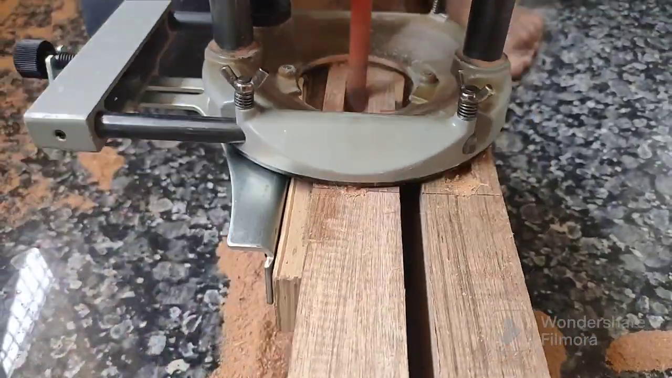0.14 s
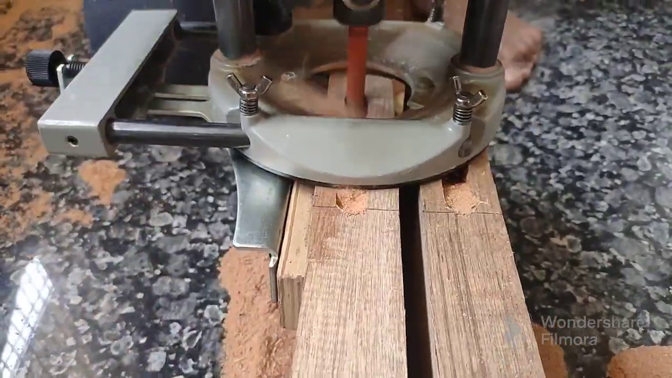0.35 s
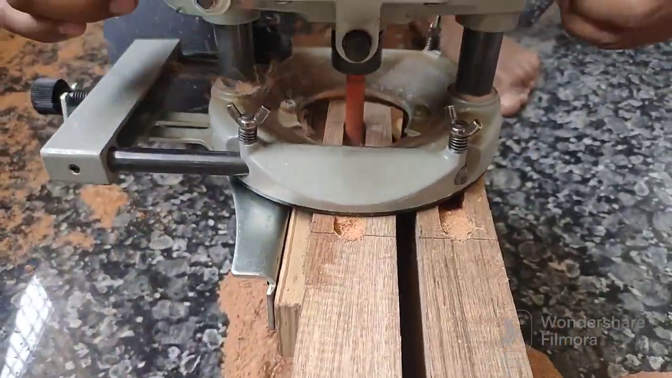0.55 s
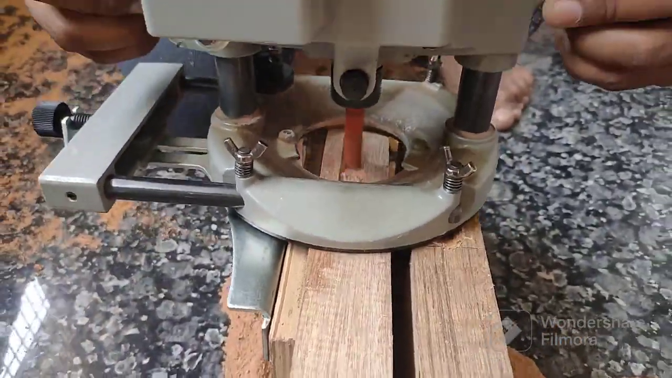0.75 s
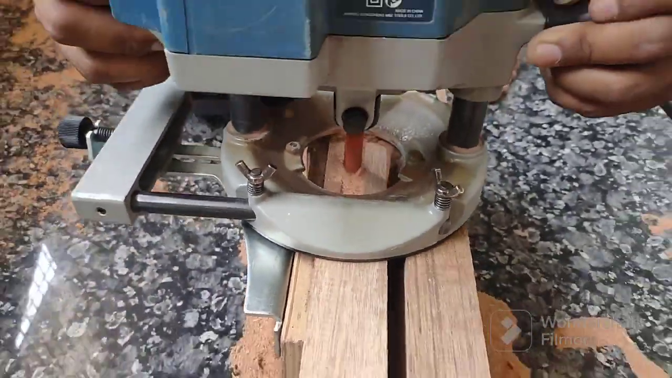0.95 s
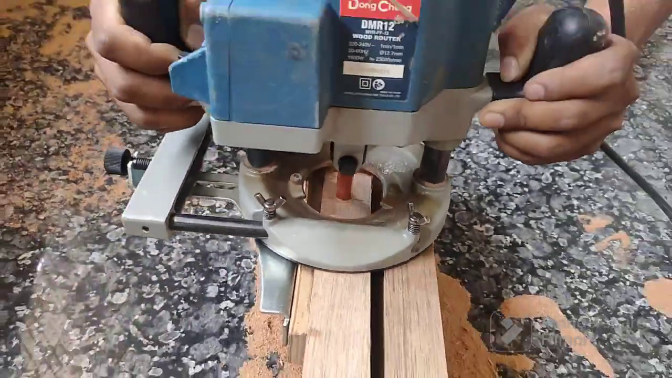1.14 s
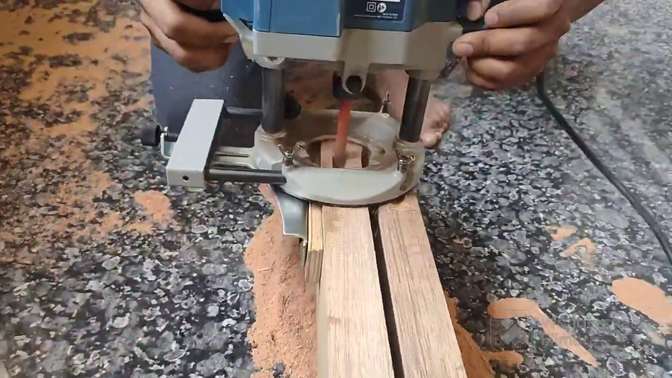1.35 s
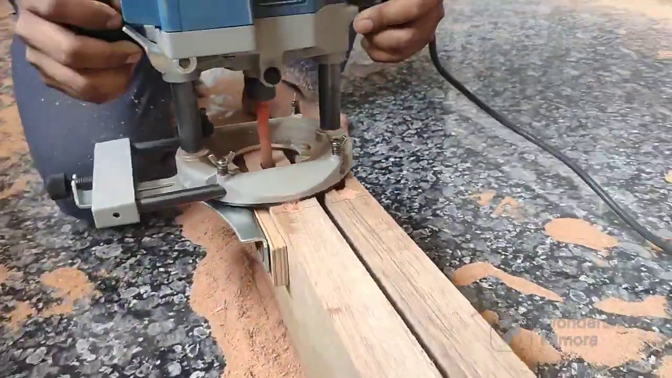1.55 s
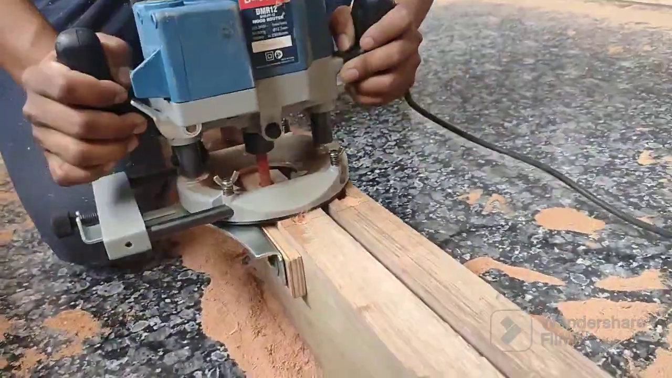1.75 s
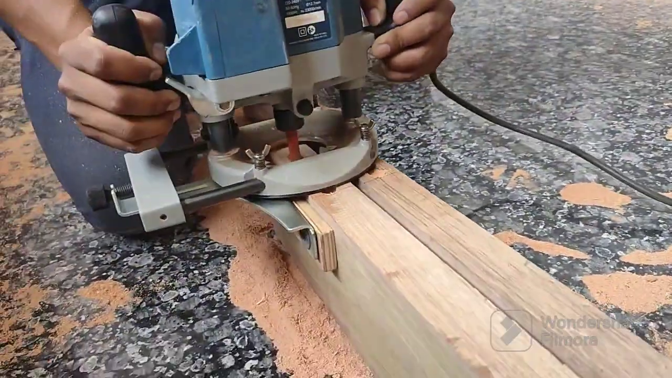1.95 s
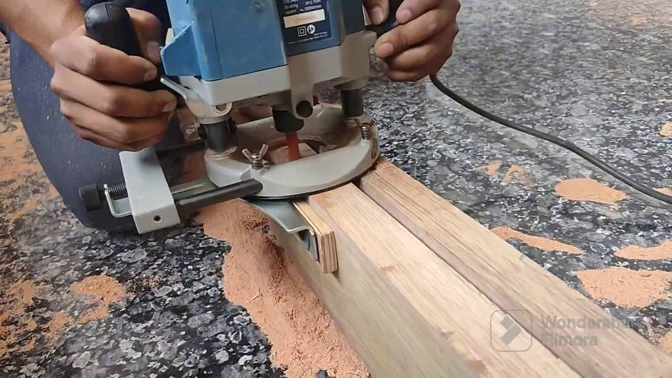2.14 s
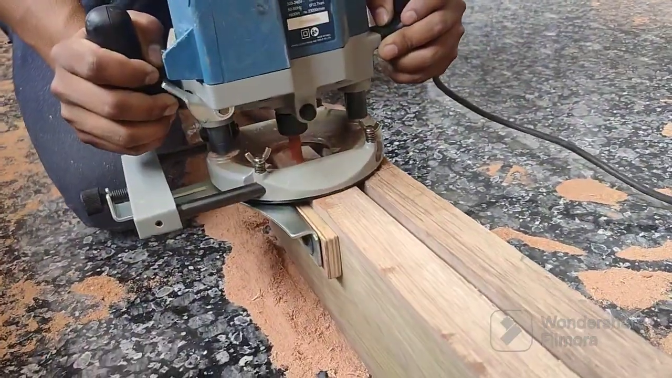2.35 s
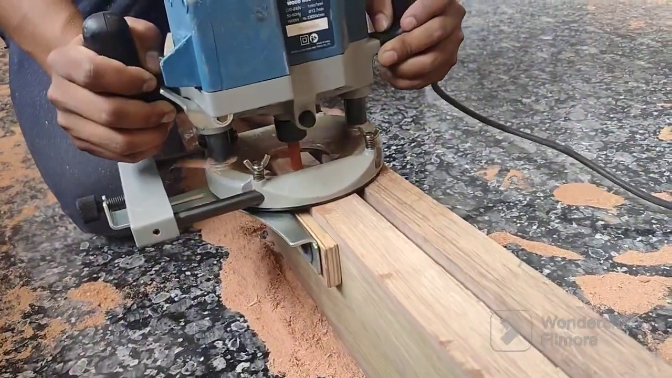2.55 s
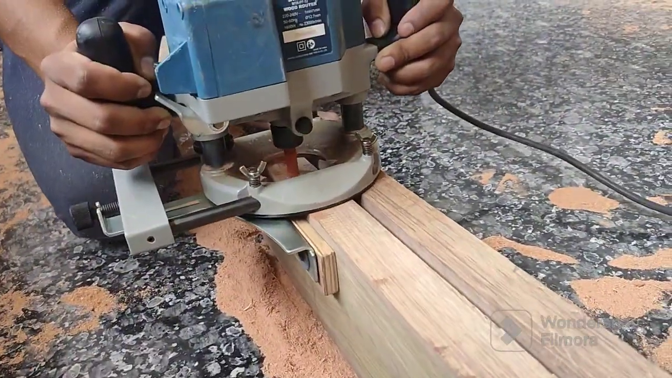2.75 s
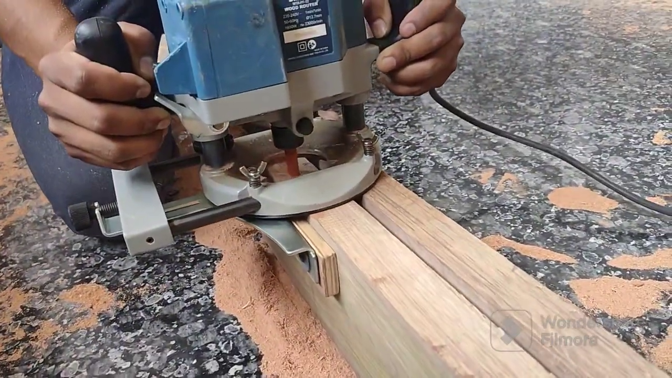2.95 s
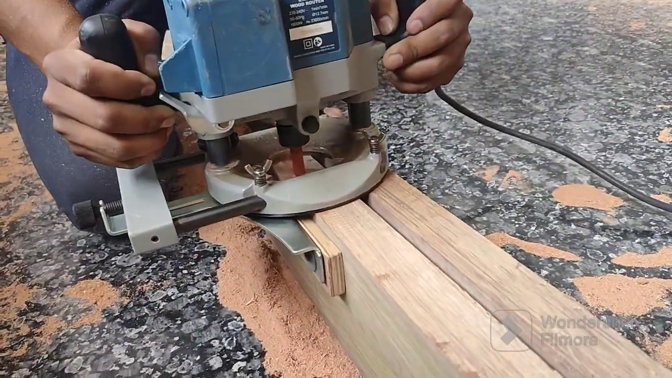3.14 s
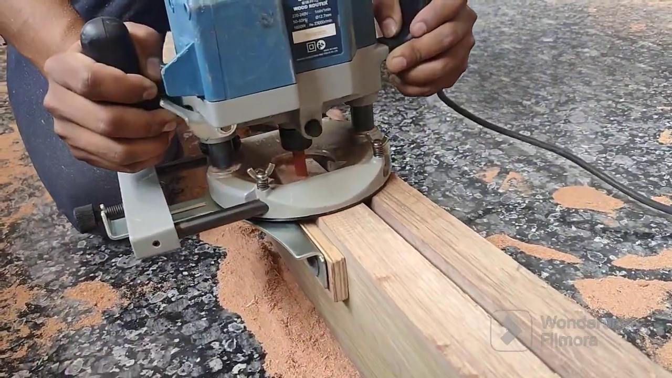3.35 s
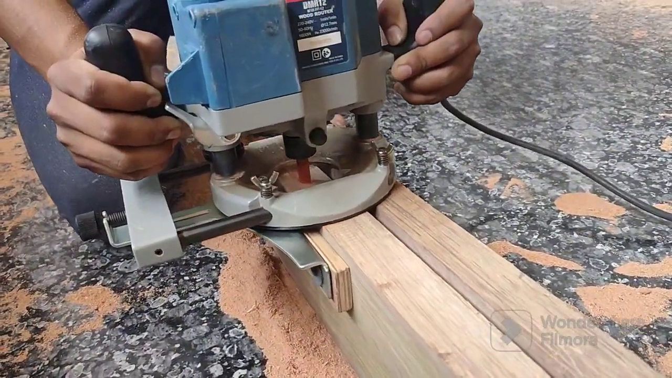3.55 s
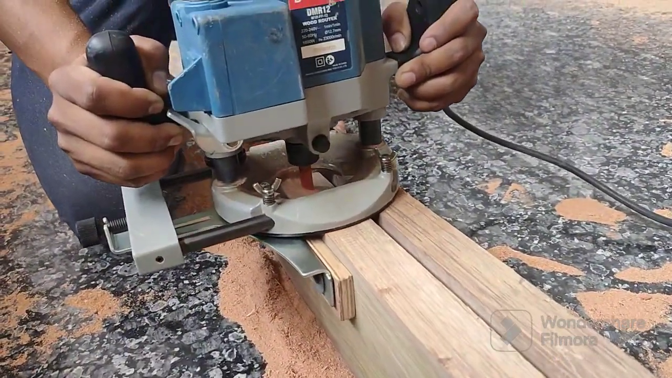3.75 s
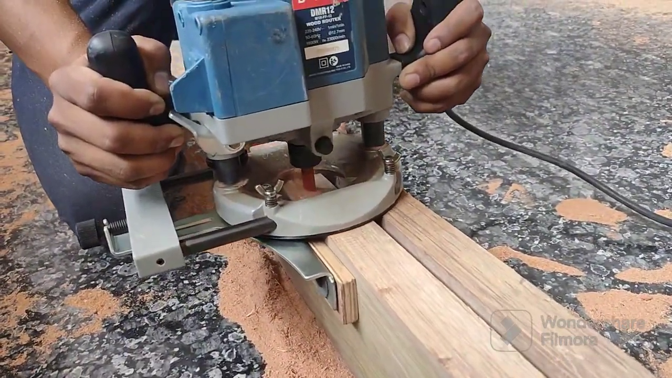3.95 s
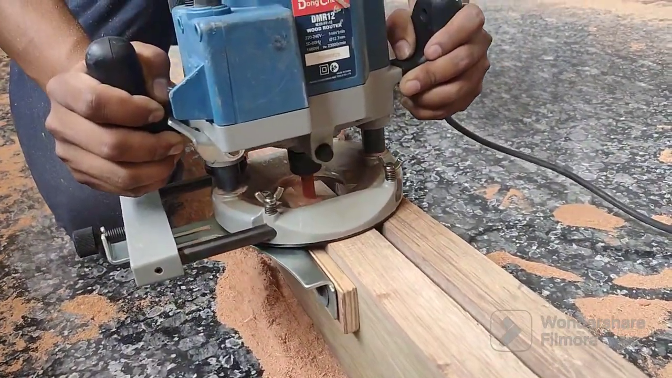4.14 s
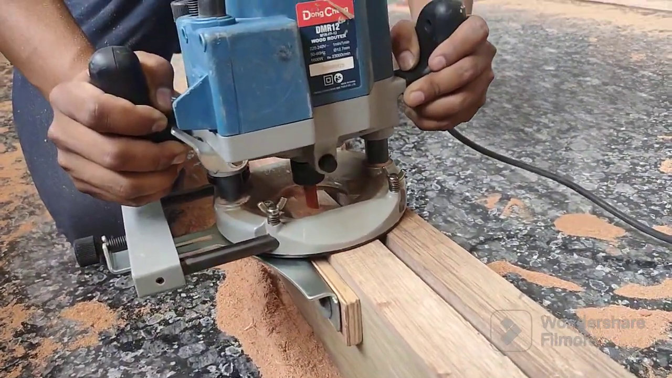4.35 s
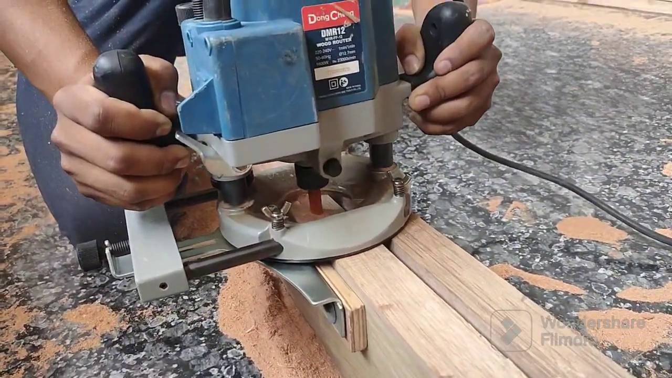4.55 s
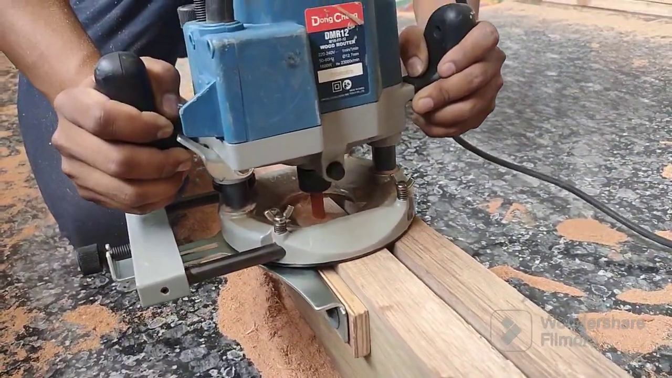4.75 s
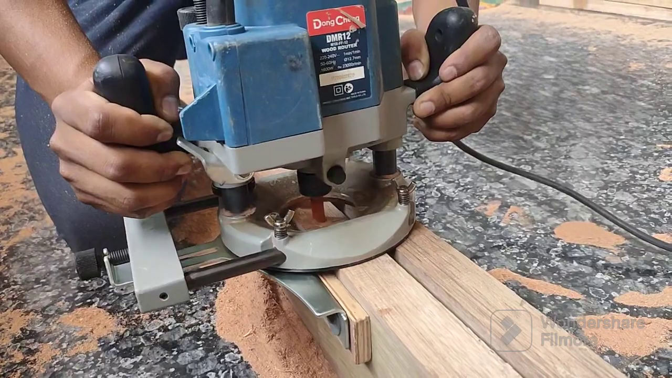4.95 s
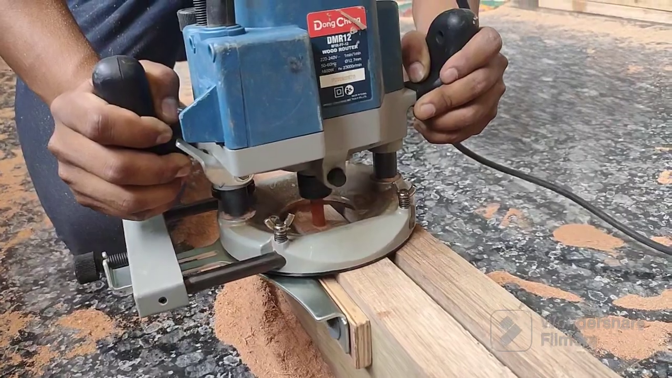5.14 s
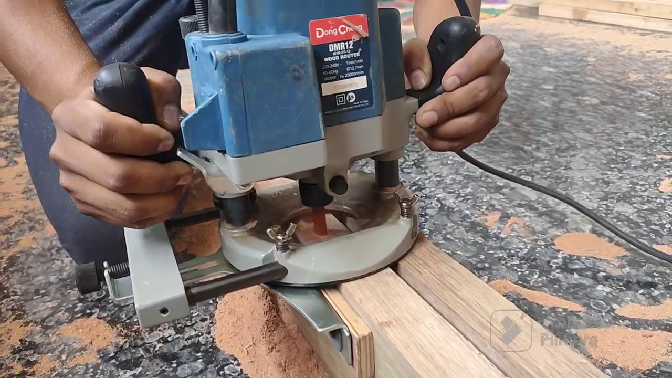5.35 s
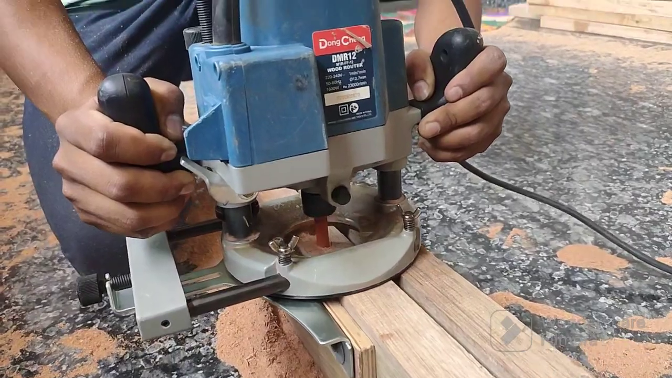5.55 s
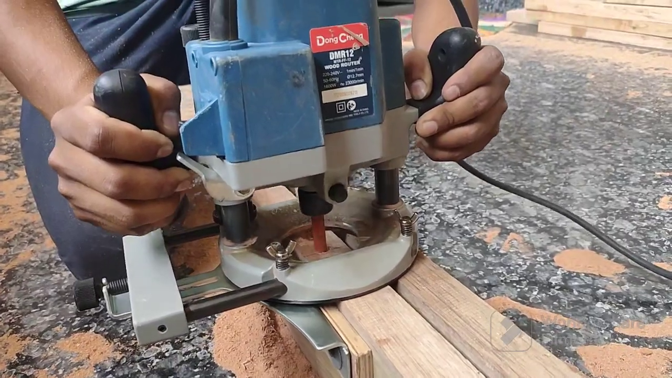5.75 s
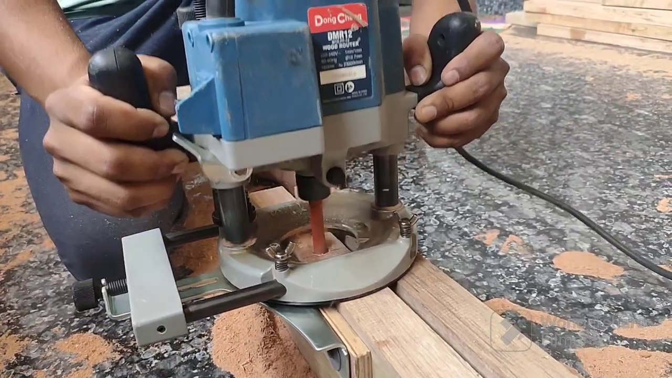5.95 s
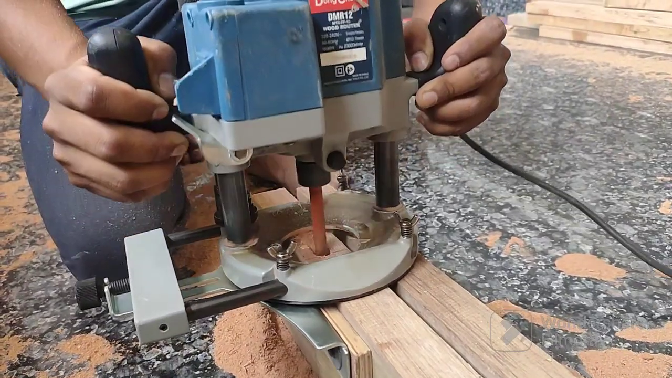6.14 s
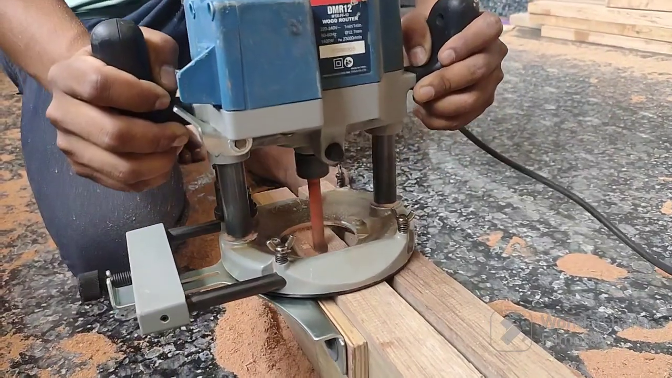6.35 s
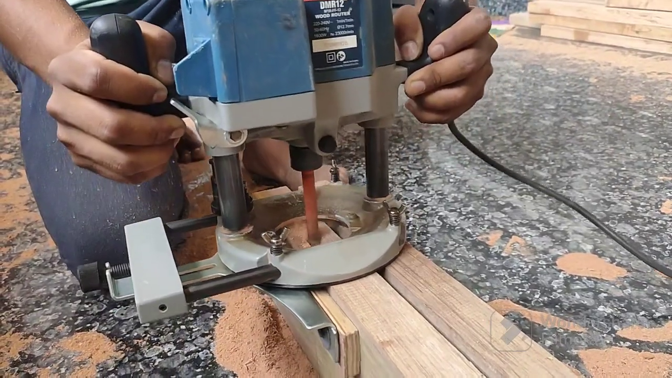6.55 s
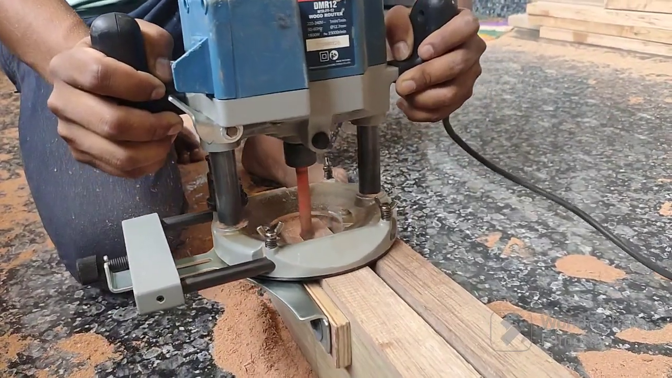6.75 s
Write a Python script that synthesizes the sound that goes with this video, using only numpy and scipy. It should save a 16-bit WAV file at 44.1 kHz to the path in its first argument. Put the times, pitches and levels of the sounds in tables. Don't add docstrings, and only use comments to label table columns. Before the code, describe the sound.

A handheld router works on a wooden batten, recorded closely indoors with the right channel almost silent. Whine climbs, then sags twice under load with gritty snarls, a brief free scream between. A long, dense, wavering grind follows, metallic chatter flickering in it. Finally the bit leaves the wood and the motor speeds up into a cleaner airy whir. Soft bumps from the hands early on; slightly dulled, compressed sound.

```python
import sys
import numpy as np
from scipy import signal
from scipy.fft import rfft, irfft, next_fast_len
from scipy.io import wavfile
from scipy.ndimage import uniform_filter1d

SR = 44100
rng = np.random.default_rng(int(sys.argv[2]) if len(sys.argv) > 2 else 0)


def dump(signal):
    limited = np.clip(np.atleast_2d(signal).T, -1, 1)
    pcm = np.round(limited * 32767).astype(np.int16)
    wavfile.write(sys.argv[1], SR, pcm)


def makeup_ratio(level_db):
    decades = np.asarray(level_db, float) / 20
    return 10 ** decades


N = 303402


def rms_one(x):
    return x / np.sqrt(np.mean(x ** 2) + 1e-20)


def in_time(rows):
    s, *columns = np.transpose(rows)
    return [np.interp(np.arange(N) / SR, s, c) for c in columns]


def at_hz(points, hz):
    return np.interp(np.log(hz), np.log(np.array(points)[:, 0]), np.array(points)[:, 1])


def swells(rows):
    t = np.arange(0, N + 40, 40) / SR
    total = sum(height * np.exp(-.5 * ((t - s) / half_s) ** 2) for s, height, half_s in rows)
    return np.interp(np.arange(N) / SR, t, total)


def bursts(rows):
    return swells([(s, makeup_ratio(db), half_s) for s, db, half_s in rows])


def drift(rate_hz):
    pole = np.exp(-80 * np.pi * rate_hz / SR)
    white = rng.standard_normal(N // 40 + 2002)
    slow = signal.lfilter([1], [1, -2 * pole, pole * pole], white)[2000:]
    return np.interp(np.arange(N) / 40, np.arange(len(slow)), rms_one(slow))


def colour(x, spectrum):
    size = next_fast_len(N)
    gain = makeup_ratio(at_hz(spectrum, np.fft.rfftfreq(size, 1 / SR) + 1))
    return irfft(rfft(x, size) * gain, size)[:N]


def patchy_noise(spectrum, shared_db, own_db, rate_hz):
    ends_hz = np.array(spectrum)[[0, -1], 0]
    edges_hz = np.geomspace(ends_hz[0], min(ends_hz[1], 16000), 8)
    white, together, out = rng.standard_normal((2, N)), drift(rate_hz), 0
    for k, (low, high) in enumerate(zip(edges_hz, edges_hz[1:])):
        bandpass = signal.butter(2, [low, high], "band", fs=SR, output="sos")
        band = signal.sosfilt(bandpass, white[k % 2])
        out = out + band * makeup_ratio(shared_db * together + own_db * drift(rate_hz))
    return rms_one(colour(out, spectrum))


def room(x, t60_s):
    t = np.arange(int(.5 * SR)) / SR
    tail = rng.standard_normal(len(t)) * makeup_ratio(-60 * t / t60_s)
    return signal.fftconvolve(x, tail / np.linalg.norm(tail))[:N]


def bumps():
    # start in seconds, peak in dB, pitch in Hz, t60 in seconds.
    shifts = [
        (0.906, -19.5, 28, 0.2),
        (1.15, -24, 34.73, 0.099),
        (1.225, -31, 37.2, .06),
        (1.289, -25, 50, 0.066),
        (5.54, -37, 30, 0.23),
    ]
    out = np.zeros(N)
    for s, db, hz, t60_s in shifts:
        t = np.maximum(np.arange(N) / SR - s, 0)
        out += makeup_ratio(db - 60 * t / t60_s) * (1 - np.exp(-t / 0.0036)) * np.sin(2 * np.pi * hz * t)
    return out


def handling():
    # frequency in Hz, level in dB.
    thump = [(15, -6), (30, -4), (60, -3), (120, -2.5), (220, -9), (400, -16), (800, -41.5)]
    # centre in seconds, level in dB, half length in seconds.
    gusts = [(.4, -47, 0.02), (.925, -38, 0.017), (1.167, -46, 0.012), (1.24, -36, 0.015),
             (1.302, -19.5, 0.0071), (1.5, -59, 0.015), (1.63, -51, 0.026), (2.17, -46, 0.045),
             (2.434, -51, 0.019), (2.66, -52, 0.092), (3.85, -51, 0.071), (4.43, -52, 0.046),
             (4.96, -51, 0.053), (5.35, -53, .08), (5.57, -43, 0.034), (6.57, -47, 0.042)]
    rumble_gain = makeup_ratio(-56.5 + 0.64 * drift(1.8)) + bursts(gusts)
    left = bumps() + rumble_gain * rms_one(colour(rng.standard_normal(N), thump))
    right = makeup_ratio(-78 + 8.0 * drift(6.5)) * rms_one(colour(rng.standard_normal(N), thump))
    return left, right


def shaft():
    # time in seconds, speed in turns per s.
    first_plunge = [
        (0, 274),
        (.47, 363),
        (.52, 345),
        (.62, 340.5),
        (.77, 323),
        (.91, 288),
        (.99, 279.3),
        (1.27, 274.7),
        (1.335, 264),
    ]
    second_plunge = [
        (1.78, 363),
        (1.83, 353.4),
        (1.95, 342),
        (2.11, 316),
        (2.18, 281),
        (2.27, 271.7),
        (2.61, 259.2),
    ]
    slot = [
        (2.85, 261.8),
        (3.02, 257.7),
        (3.2, 258.7),
        (4.15, 256.1),
        (4.78, 267.5),
        (5.28, 270.8),
        (5.7, 270),
        (5.84, 280.4),
        (5.91, 280),
    ]
    # start in seconds, free speed in turns per s, slow gap in turns per s,
    # slow time in seconds, quick gap in turns per s.
    run_ups = [
        (.025, 367, 75, .15, 28),
        (1.335, 367, 75, .15, 28),
        (5.91, 340, 60, .6, 0),
    ]
    quick_s = .02
    loaded = first_plunge + second_plunge + slot
    speed, t = in_time(loaded)[0], np.arange(N) / SR
    speed[t < run_ups[0][0]] = loaded[0][1]
    for start_s, top, slow_gap, slow_s, quick_gap in run_ups:
        end_s = min([s for s, _ in loaded if s > start_s] + [N / SR])
        free = (t >= start_s) & (t < end_s)
        since = t[free] - start_s
        speed[free] = top - slow_gap * np.exp(-since / slow_s) - quick_gap * np.exp(-since / quick_s)
    return speed


def feed():
    # centre in seconds, push in dB, half length in seconds.
    pushes = [(.47, 4, 0.016), (.61, 4, 0.021), (.74, 1.5, 0.062), (.84, 0, 0.023), (.96, -6.5, 0.039),
              (1.04, 2.5, 0.049), (1.21, 6.5, 0.0078), (1.3, 6, 0.0066), (2.0, 7, 0.025),
              (2.15, 5.5, 0.068), (2.25, -3, 0.043), (2.43, 3.5, 0.039), (2.575, 5.5, 0.027),
              (2.72, 3, 0.035), (2.92, 4, 0.055), (3.3, 3, 0.16), (3.85, 3.5, 0.064), (4.45, 2, 0.1),
              (4.75, 0.5, 0.014), (4.92, 5.5, 0.11), (5.08, 4.5, 0.018), (5.28, 6, 0.063),
              (5.57, 10, 0.046), (5.68, 0, 0.035), (5.75, 2.5, 0.014), (5.8, 0, 0.02), (5.88, 2.5, 0.036),
              (6.01, 3.5, 0.014), (1.505, 3, 0.01), (1.08, 0.5, 0.0092), (1.14, 3.5, 0.021),
              (6.69, 0, 0.036)]
    return swells(pushes)


def housing():
    # frequency in Hz, width in Hz, level in dB.
    resonances = [(866, 57, -3.5), (949, 55, 1), (1326, 41, -8), (1888, 14, -5.5), (2407, 140, -3),
                  (2573, 100, -1.5), (2890, 34, -6)]
    hz, white = np.fft.rfftfreq(N + 2, 1 / SR), rng.standard_normal(N + 2)
    power = sum(makeup_ratio(2 * db) / (1 + (2 * (hz - at) / width) ** 2) ** 2 for at, width, db in resonances)
    return rms_one(irfft(rfft(white) * np.sqrt(power), N + 2)[:N])


def motor_levels(speed, push_db):
    # time in seconds, level in dB, view of the fan outlet in dB.
    fan_air = [(0, -26, -14.5), (.29, -17.5, -15), (.47, -18, -14), (.51, -22, -16.5), (.9, -21.5, -14.5),
               (1.3, -23, -20), (1.482, -22.5, -13), (1.495, -22, -4.5), (1.6, -22, -6), (1.81, -22, -6),
               (1.822, -26, -9.5), (2.0, -23.5, -12), (2.3, -23.5, -11.5), (3.7, -24, -7.5),
               (4.5, -26.5, -8), (4.92, -24.5, -10), (5.44, -26.5, -10.5), (5.62, -31, -9.5),
               (5.8, -33, -12), (6.88, -27, -8.5)]
    # time in seconds, level in dB.
    unbalance = [(0, -48), (.17, -23), (.44, -29), (.52, -40), (.89, -38), (1.1, -49), (1.3, -39),
                 (1.5, -36), (2.07, -41), (2.5, -37.5), (2.9, -42), (3.08, -51), (4.33, -54), (4.45, -42),
                 (4.92, -28), (5.6, -42), (6.3, -47), (6.75, -36)]
    # centre in seconds, blade tone in dB, half length in seconds.
    inlet_turns = [(.1, 11, 0.062), (.52, 7, .03), (.68, 4, 0.025), (.83, 3, .04), (.29, 8, 0.036),
                   (.44, -8, 0.033), (.6, 10, .04), (.75, -3, .03), (1.36, -8, .02), (1.42, 10, .03),
                   (1.65, -1, 0.039), (1.56, 12.5, 0.046), (1.77, 12.5, 0.034), (1.88, 13, 0.028),
                   (1.97, 16, 0.019), (2.15, 6, 0.075), (5.65, 11, .03), (6.0, 20.5, 0.05), (6.3, 7, 0.052),
                   (6.68, 15.5, 0.094), (6.85, 10, 0.033)]
    # centre in seconds, change in dB, half length in seconds.
    grip = [(.5, -8, 0.022), (.93, -4, .03), (1.36, 6, .04), (1.48, -14, 0.022), (1.83, 1, 0.021),
            (2.16, -18, 0.029), (2.3, 1.5, 0.057), (5.42, -8, .05), (5.95, 12, 0.046), (6.08, -11, 0.045),
            (6.4, -13, .03), (6.55, -1, .03)]
    air_db, view_db = in_time(fan_air)
    null_hz, null_width_hz, null_peak_db = 287.4, 5.5, -15.5
    null_db = null_peak_db * np.exp(-.5 * ((speed - null_hz) / null_width_hz) ** 2)
    blade_rel_db = np.minimum(-17 + 0.5 * (speed - 300), -13.5)
    blade_db = air_db + view_db + blade_rel_db + swells(inlet_turns)
    shake_db = in_time(unbalance)[0] + null_db + swells(grip) + 2.1 * drift(10.0)
    roar_db = air_db + .25 * push_db
    hiss_db = air_db + view_db + .8 * push_db
    return shake_db, blade_db, roar_db, hiss_db


def motor(turns, unbalance_db, blade_db, roar_db, hiss_db):
    # frequency in Hz, density in dB per Hz.
    roar_spectrum = [(200, -29.5), (370, -13), (470, -9), (650, -6.5), (930, 0), (1110, 0.5), (1350, 0),
                     (1750, -1), (2400, 1.5), (3000, -3.5), (3700, -12.5), (4600, -25.5)]
    # frequency in Hz, density in dB per Hz.
    hiss_spectrum = [(2800, -4.5), (3400, -2), (3900, -3.5), (4650, 0.5), (6000, -3.5), (9500, -8.5),
                     (10400, -6), (12500, -4.5), (13900, -8.5), (14600, -15), (15500, -58)]
    # order, level in dB against the blade tone.
    slot_orders = [(28, -12), (36, -14)]
    fan_blades = 14

    def sine(order):
        wobble_rad = .6 * min(order / fan_blades, 1) * drift(30)
        return np.sqrt(2) * np.sin(2 * np.pi * order * turns + wobble_rad)

    blades = sine(fan_blades) + sum(makeup_ratio(db + 2.0 * drift(14.0)) * sine(order) for order, db in slot_orders)
    whine = makeup_ratio(blade_db + 2.8 * drift(16)) * blades
    air = patchy_noise(roar_spectrum, shared_db=.6, own_db=1.4, rate_hz=19)
    echoed_air = rms_one(air + .35 * room(air, t60_s=.12))
    roar = makeup_ratio(roar_db) * (echoed_air + makeup_ratio(-9) * housing())
    hiss = makeup_ratio(hiss_db) * patchy_noise(hiss_spectrum, shared_db=0.0, own_db=1.5, rate_hz=10.6)
    pulse = 1 + 0.1 * np.cos(2 * np.pi * turns) + 0.14 * np.cos(4 * np.pi * turns)
    return makeup_ratio(unbalance_db) * sine(1) + whine + pulse * (roar + hiss)


def lines(orders, turns, speed, base_hz, wander_db, wander_rate, shake, flares=()):
    # frequency in Hz, level in dB.
    batten = [(500, -34), (750, -17.5), (930, 6.5), (1100, -4), (1350, 7), (1600, 3), (1900, 1.5),
              (2200, 1.5), (2500, 3.5), (2900, -5.5), (3300, -11), (3700, -23), (4100, -25), (4650, -15.5),
              (5600, -28.5)]
    gains = [makeup_ratio(at_hz(batten, np.abs(base_hz + k * speed))) for k in orders]
    base_turns = np.cumsum(base_hz) / SR
    flare_rows = dict(flares)
    tones = 0
    for k, gain in zip(orders, gains):
        level_db = wander_db * np.minimum(drift(wander_rate), 1.2)
        if k in flare_rows:
            level_db = level_db + swells(flare_rows[k])
        phase = 2 * np.pi * (k * turns + base_turns + rng.random()) + shake * drift(wander_rate * 2.0)
        tones = tones + gain * makeup_ratio(level_db) * np.sin(phase)
    return tones * np.sqrt(2 / sum(gain ** 2 for gain in gains))


def cut_levels(speed, push_db):
    # time in seconds, bite in dB, unevenness of the two flutes in dB, sharpness of each blow in dB.
    cut = [(0, -34.5, 17.5, 6), (.07, -43.5, -4, 16), (.38, -42.5, 14, 12), (.5, -33, 9, 1.5),
           (.8, -36.5, 8.5, 12), (1.0, -30, 4, 7), (1.3, -30, 11, 4), (1.4, -51, 1, 8),
           (1.77, -35, -5, -12), (1.82, -33, 6, -4), (1.9, -31, -1, -32), (2.02, -35, 3.5, 10),
           (2.3, -28, -0.5, 1.5), (3.32, -22.5, -7.5, 0.5), (4.09, -24.5, -2.5, 2.5), (4.4, -23, 2, 0),
           (4.92, -30, 6.5, 5.5), (5.6, -34.5, 8.5, 6.5), (5.97, -43, 10.5, 6.5), (6.14, -35, 9, 0)]
    # speed in turns per s, gain in dB, half width in turns per s.
    plate = [(318.4, 7.5, 32.3), (284, -11, 3.15)]
    # centre in seconds, change in dB, half length in seconds.
    flute_breaks = [(.6, -6, 0.056), (.87, 5, 0.023), (1.3, -9, 0.041), (1.5, 8, 0.047), (1.77, -1, 0.038),
                    (1.86, -3, 0.045), (1.96, -3, 0.063), (2.07, 11.5, 0.015), (5.88, 0, .03),
                    (6.03, 13, 0.034), (6.16, 23, 0.027), (5.95, -3, 0.033)]
    bite_db, uneven_db, sharp_db = in_time(cut)
    clear_s, clear_fade_s, clear_db = 5.98, .13, -40
    bite_db = bite_db + clear_db * np.clip((np.arange(N) / SR - clear_s) / clear_fade_s, 0, 1)
    plate_db = sum(db * np.exp(-.5 * ((speed - at) / half) ** 2) for at, db, half in plate)
    flute_db = bite_db + plate_db + swells(flute_breaks)
    return bite_db, flute_db, bite_db + uneven_db + push_db, bite_db + sharp_db + push_db


def chatter(turns, speed, bite_db, high_db):
    # time in seconds, bending pitch in Hz, readiness to chatter in dB.
    bending = [(0, 841, 3), (.36, 946, -8), (.5, 994, 0.5), (.72, 937.6, 9), (.82, 880, 5), (.95, 823, 5),
               (.97, 823, -14), (.98, 1002, -2), (1.02, 1008, -1.5), (1.3, 1014, 3.5), (1.95, 973, 3),
               (2.1, 914, 3), (2.17, 843, 2), (2.235, 819, -5), (2.245, 977, 7), (2.3, 966, 13),
               (2.42, 902, 5.5), (2.8, 895, 3), (3.0, 896, 5), (3.12, 929.5, -0.5), (3.68, 930.5, 5),
               (3.92, 917, 6), (4.12, 920, 2.5), (4.8, 957, 3), (5.2, 982, 3.5), (5.5, 1006, -4)]
    # centre in seconds, level in dB, half length in seconds.
    ringing = [(0, -23.5, 0.02), (.41, -33, 0.016), (.83, -18.5, 0.028), (.91, -24, .035),
               (1.18, -30, 0.027), (1.67, -34, 0.056), (2.13, -17.5, 0.025), (2.41, -15, 0.007),
               (2.545, -13.5, 0.007), (2.674, -20, 0.018), (2.86, -14.5, 0.011), (2.98, -24, 0.019),
               (3.26, -20, 0.083), (3.46, -21.5, 0.033), (3.68, -20.5, 0.051), (3.82, -19, 0.02),
               (4.056, -24, 0.024), (4.28, -27.5, 0.073), (4.49, -22.5, 0.011), (4.66, -23.5, 0.023),
               (4.86, -24, 0.053), (5.075, -26, 0.042), (5.19, -29, 0.053)]
    # centre in seconds, change in dB, half length in seconds.
    side_flares = [
        [(.89, 19.5, 0.045), (1.23, 8.5, 0.14), (2.63, 4.5, 0.58), (3.3, -7, 0.041), (4.72, 7.5, 0.42),
         (5.18, 10.5, 0.012)],
        [(1.08, -2, 0.15), (2.42, -17, 0.023), (3.21, -11, 0.077), (3.87, -6, 0.39), (3.96, 4, 0.036)],
        [(1.16, 12, 0.24), (3.03, -29, 0.038), (3.84, -11, 0.31), (4.8, 5, .15), (5.19, 9, 0.06)],
        [(.7, 8, 0.06), (1.95, -17, 0.27), (2.79, 10, 0.078), (3.46, -15, 0.093), (4.51, -5, .04),
         (4.93, -7, 0.43)],
        [(.72, -6, 0.059), (.85, 6, .04), (2.07, -3, 0.08), (3.93, -7, 0.025), (4.73, 5.5, 0.082)],
        [(1.08, -13, 0.14), (2.29, -11, 0.036), (3.47, 5, 0.34), (3.59, 3, 0.026), (4.16, 6, .04),
         (5.2, -4, 0.51)],
        [(4.17, -8, .35)],
        [(3.25, 10.5, 0.19), (4.37, 10, 0.1), (4.95, 6.5, 0.098)],
        [(3.46, 10, 0.27), (4.28, 11.5, 0.2)],
    ]
    # centre in seconds, level in dB against the side lines, half length in seconds.
    doubling = [
        (1.15, -8, .12),
        (2.6, -3, .2),
        (3.5, -3, 0.21),
        (4.1, -8, .15),
        (4.9, -11, 0.39),
    ]
    skipping = [
        (2.75, -9, .2),
        (3.5, -12, .2),
        (4.0, -2, 0.18),
        (4.45, -6, 0.14),
        (5.0, -10, 0.3),
    ]
    hz, ready_db = in_time(bending)
    line = lines([0], turns, speed, hz, wander_db=1.5, wander_rate=12.0, shake=.3)
    line = (makeup_ratio(bite_db + ready_db - 10) + bursts(ringing)) * line
    above = lines([-1, *range(1, 17)], turns, speed, hz, wander_db=3.8, wander_rate=14.0, shake=.4,
                  flares=enumerate(side_flares, 1))
    mirror = makeup_ratio(-10) * lines([9, 10], turns, speed, -hz, wander_db=4.0, wander_rate=9.0, shake=.5)
    double = lines(range(-1, 7), turns, speed, 2 * hz, wander_db=4.0, wander_rate=9.0, shake=.5)
    skip = lines(range(5, 11), turns, speed, speed / 2, wander_db=4.0, wander_rate=9.0, shake=.4)
    sides = above + mirror + bursts(doubling) * double + bursts(skipping) * skip
    return line + makeup_ratio(high_db + ready_db - 6) * sides


def cutter(turns, speed, flute_db, low_db, high_db):
    # time in seconds, orders 3-4 against order 5 in dB.
    seating = [(0, -1.5), (.95, 3.5), (1.05, -11), (1.8, 3), (2.2, 4), (2.35, -3.5), (3.2, 0), (4.4, -8.5),
               (4.8, -6), (5.3, 0.5), (6.88, -9)]
    # centre in seconds, change in dB, half length in seconds.
    order_flares = [
        [(.94, 14.5, 0.025), (2.0, 5.5, .04), (2.19, 10, 0.036), (2.85, -13, .07), (3.77, 15, 0.34),
         (4.93, 7.5, 0.099), (5.55, 6.5, 0.22), (5.66, -12, 0.018), (5.78, -5, 0.018), (5.87, 9.5, 0.039)],
        [(2.0, 5, 0.037), (2.5, 10.5, 0.029), (4.13, -18, .2), (4.61, 8, 0.035), (5.23, -13, 0.032),
         (5.35, 6, 0.059), (5.45, -6, .03), (5.7, -7, 0.03), (6.02, 14, 0.041)],
        [(1.2, -10, 0.061), (2.96, 6, 0.59), (4.0, -6, 0.14), (4.35, 2.5, 0.17), (4.75, 6, .05), (5.3, 7, 0.03),
         (5.43, -2, .04), (5.68, -4, 0.028), (5.9, 5.5, 0.12), (6.03, -8, 0.038)],
        [(1.05, 9, 0.068), (3.1, -13, 0.074), (3.92, 6, 0.26), (4.35, -16, 0.035)],
        [(1.13, -9, 0.036), (2.02, -18, 0.068), (3.42, -3, .35), (4.2, 8.5, .07), (5.1, -23, 0.049)],
        [(.75, -11, 0.06), (2.34, -12, 0.17), (3.67, 10, 0.041), (4.2, 5.5, 0.14), (5.57, 4, 0.023),
         (5.8, 7, .03)],
        [(1.03, 10, 0.087), (3.31, -11, 0.063), (4.51, 6, 0.13), (4.94, -10, .12), (5.33, -21, 0.02),
         (5.55, 0, 0.041)],
        [(2.75, 9, 0.051), (3.96, 4, 0.062), (4.46, -12, 0.15), (5.5, -9, 0.37)],
        [(1.05, 12, 0.061), (3.28, 7.5, 0.1), (5.54, 5.5, 0.029)],
        [(4.91, -11, 0.22)],
    ]
    flares = list(enumerate(order_flares, 3))
    flutes = makeup_ratio(flute_db) * np.sqrt(2) * np.sin(4 * np.pi * turns)
    grazing = np.clip((speed - 275) / 20, 0, 1)
    flutes = flutes * makeup_ratio(2.5 * grazing * drift(11))
    still = 0 * speed
    fifth = lines([5], turns, speed, still, wander_db=2.5, wander_rate=14.0, shake=.25, flares=flares)
    below = lines([3, 4], turns, speed, still, wander_db=3.0, wander_rate=12.0, shake=.25, flares=flares)
    low = makeup_ratio(low_db - 3.5) * (fifth + makeup_ratio(in_time(seating)[0]) * below)
    high = lines(range(6, 22), turns, speed, still, wander_db=3.6, wander_rate=14.0, shake=.38, flares=flares)
    return flutes + low + makeup_ratio(high_db - 2) * high


def ducking():
    # start in seconds, depth in dB, recovery in seconds.
    jolts = [
        (.03, -6.5, 0.045),
        (1.323, -11, 0.12),
    ]
    gain_db, attack_s = 0, 0.0071
    for s, db, recovery_s in jolts:
        t = np.maximum(np.arange(N) / SR - s, 0)
        gain_db = gain_db + db * (1 - np.exp(-t / attack_s)) * np.exp(-t / recovery_s)
    return makeup_ratio(gain_db)


def scene():
    # frequency in Hz, level in dB.
    blocked_port = [(30, -48), (200, -67), (330, -96), (520, -47.5), (900, -53.5), (1400, -40), (2000, -44),
                    (3000, -56), (6000, -33), (11800, -35), (12800, -87)]
    speed, push_db = shaft(), feed()
    turns = np.cumsum(speed) / SR
    bite_db, flute_db, low_db, high_db = cut_levels(speed, push_db)
    tool = motor(turns, *motor_levels(speed, push_db))
    tool = tool + chatter(turns, speed, bite_db, high_db)
    tool = ducking() * (tool + cutter(turns, speed, flute_db, low_db, high_db))
    left_port, right_port = handling()
    through_body = signal.sosfilt(signal.butter(2, 700, fs=SR, output="sos"), tool)
    diffuse = room(tool, t60_s=.6)
    right = colour(2.0 * through_body + diffuse, blocked_port) + right_port
    return np.array([tool + left_port, right])


def thin_out(x):
    # frequency in Hz, level in dB against the local mean.
    thinning = [(500, -16), (1200, -5), (2400, -2), (3400, -1.5), (5700, .8), (8300, 3.3), (12000, 3.8),
                (15400, 4)]
    hz, _, z = signal.stft(x, SR, window="cosine", nperseg=2048)
    local = np.exp(uniform_filter1d(np.log(np.abs(z) + 1e-12), size=48, axis=1))
    limit = makeup_ratio(at_hz(thinning, hz + 1) + np.array([[0], [4.5]]))
    kept = z * (np.abs(z) > local * limit[:, :, None])
    return signal.istft(kept, SR, window="cosine", nperseg=2048)[1][:, :N]


def zero_small(x, size, offset):
    # frequency in Hz, level in dB against the local rms.
    dead_zone = [(300, -25), (2000, -26), (3000, -20), (4000, -17), (5700, -15), (7000, -12), (8300, -10.5),
                 (11500, -13), (13000, -12), (14500, 0)]
    n, k = np.arange(2 * size) + .5, np.arange(size) + .5
    window = np.sin(np.pi * n / (2 * size))[:, None]
    basis = window * np.cos(np.pi / size * np.outer(n + size / 2, k)) * np.sqrt(2 / size)
    lead, count = size - offset, N // size + 2
    halves = np.pad(x, ((0, 0), (lead, (count + 1) * size - N - lead))).reshape(2, -1, size)
    c = np.concatenate([halves[:, :-1], halves[:, 1:]], axis=2) @ basis
    hz, power = k * SR / (2 * size), c ** 2 + 1e-20
    loud_db = uniform_filter1d(10 * np.log10(power[0].sum(axis=1)), size=9)
    top_hz = 14750 - 170 * np.maximum(loud_db - loud_db.mean(), -1)
    top_hz = top_hz + 230 * drift(9)[:: N // count][:count]
    top_step_hz = 345
    below_top = hz < np.round(top_hz / top_step_hz)[:, None] * top_step_hz
    local = uniform_filter1d(power, size=24, axis=2)
    keep = (power > local * makeup_ratio(2 * at_hz(dead_zone, hz))) & below_top
    frames = (c * keep) @ basis.T
    first = np.pad(frames[..., :size], ((0, 0), (0, 1), (0, 0)))
    second = np.pad(frames[..., size:], ((0, 0), (1, 0), (0, 0)))
    return (first + second).reshape(2, -1)[:, lead:lead + N]


def top_cut(x):
    return signal.sosfilt(signal.butter(12, 15600, fs=SR, output="sos"), x)


def record(dry):
    rounded = 0.9 * np.tanh(dry / 1.07)
    thinned = zero_small(thin_out(rounded), size=1024, offset=92)
    return top_cut(thinned)


dry = scene()
out = record(dry)
dump(out)
```